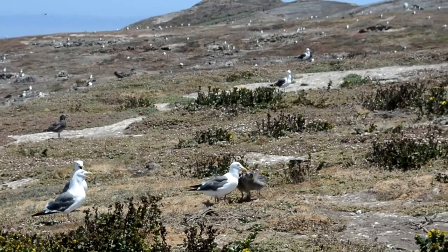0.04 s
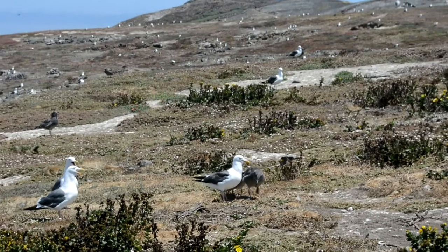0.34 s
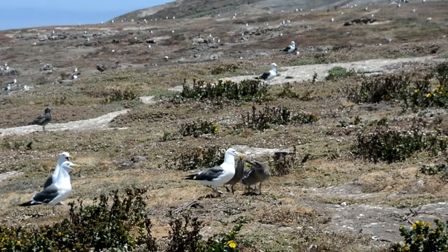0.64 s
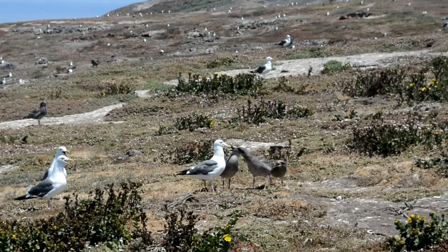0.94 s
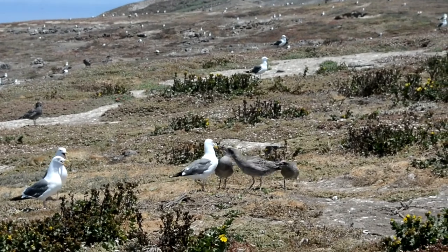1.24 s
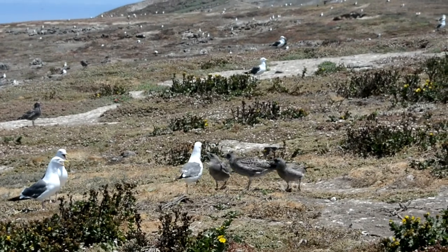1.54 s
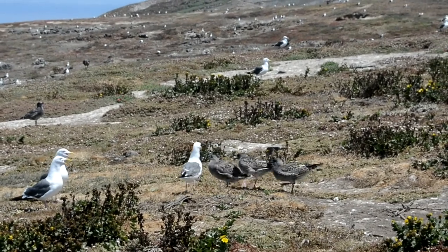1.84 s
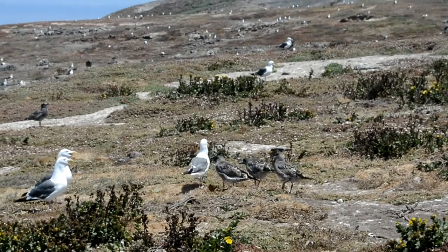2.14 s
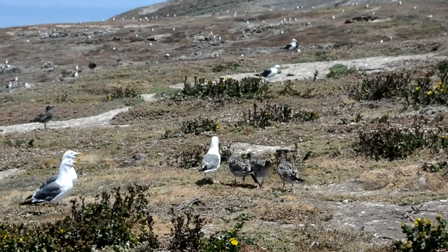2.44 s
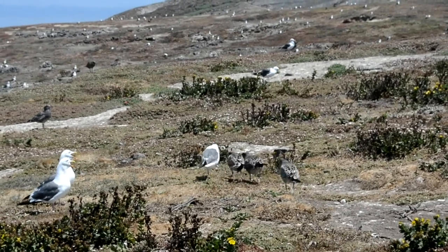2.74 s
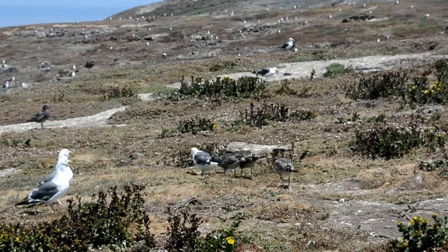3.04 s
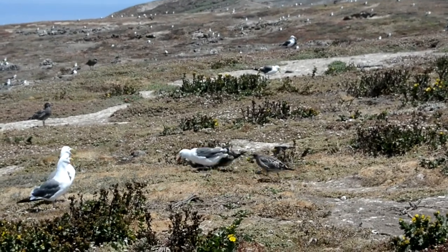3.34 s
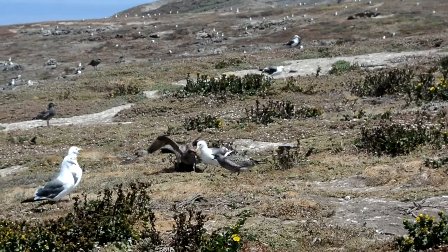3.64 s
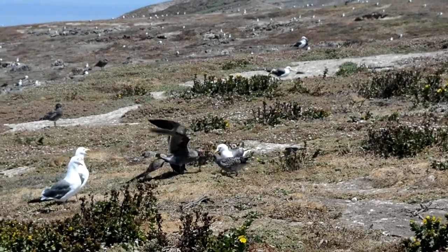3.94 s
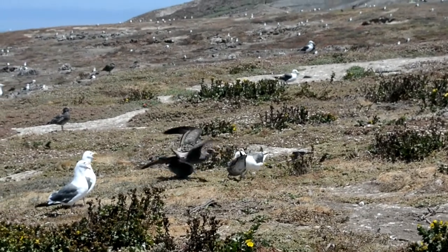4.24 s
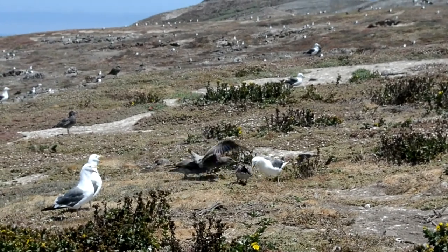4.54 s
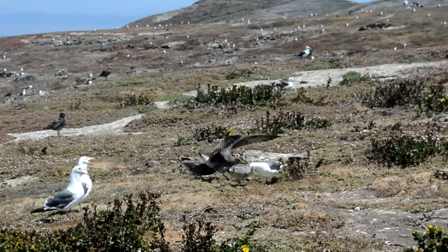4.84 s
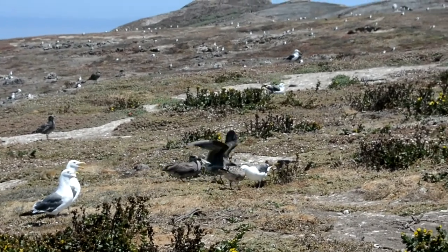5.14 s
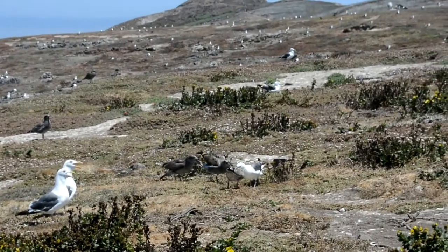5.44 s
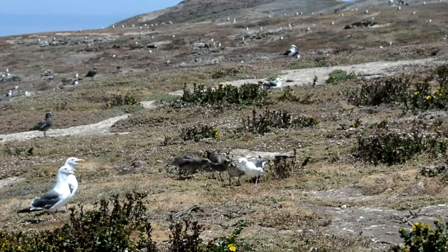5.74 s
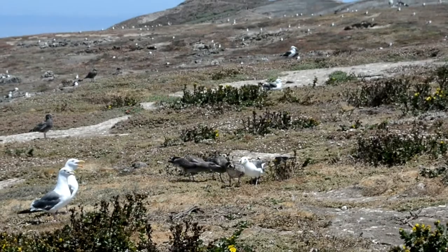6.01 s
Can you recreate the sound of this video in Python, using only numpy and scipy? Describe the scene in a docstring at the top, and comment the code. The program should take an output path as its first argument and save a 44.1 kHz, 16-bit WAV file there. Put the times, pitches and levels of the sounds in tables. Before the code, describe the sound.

A dense gull colony calls without a break for about six seconds on an open hillside. Several adults close ahead of the microphone overlap chains of short, arched cries, each at its own pitch, three or four notes a second. They are loudest in the first 1.3 seconds, and one sharp cry stands out at 2.5 seconds. Hoarse, throaty squawks pulse underneath, turning harsher from about 1.5 seconds and continuing to the end. Another clear chain of cries joins at around 4.2 seconds. Begging chicks give thin peeps and upward-breaking whistles, strongest between 0.6 and 1.2 seconds, then again near 2.1, 3.2 and 5.5 seconds. Two faint dry ticks come at about 4.4 seconds. Farther up the slope, hundreds of gulls merge into a restless din. There is hardly any echo, and light wind puffs on the microphone, mainly at the very start.

```python
"""Gulls giving long calls close ahead of the microphone, in a colony on an open hillside.
Each call is a steady chain of short arched cries, a tone from the syrinx with overtones shaped by the bill.
Under them, hoarse squawks pulse through throat and beak, and begging chicks whistle.
Farther up the slope, hundreds of birds merge into a din. Scrub and rock return a faint tail,
two dry ticks sound nearby, and a little wind touches the microphone."""
import sys
import numpy as np
from scipy import signal
from scipy.fft import rfft, irfft, next_fast_len
from scipy.io import wavfile
from scipy.ndimage import uniform_filter1d, map_coordinates

SR = 44100
rng = np.random.default_rng(int(sys.argv[2]) if len(sys.argv) > 2 else 0)


def pcm_store(signal):
    """Save signal as 16-bit PCM."""
    levels = np.round(np.clip(np.atleast_2d(signal), -1, 1) * 32767)
    wavfile.write(sys.argv[1], SR, levels.astype(np.int16).T)


N = 267995

# The near adults' long calls. Each bird: period, lead to the crest and trail after it in seconds,
# roughness 0-1, upper overtones in dB against the octave, course. Each row of a course marks a note:
# crest in seconds, crest pitch in Hz, fundamental in dB, octave in dB before the bill shapes it.
LONG_CALLS = { "leader": (.273, .034, 0.0472, 0.14, 0.21, [(-.024, 1727, -33, -31.5),
              (.517, 1728, -35, -31), (1.339, 1750, -35.5, -32.5), (1.888, 1726, -37, -30),
              (2.429, 1730, -36, -28.5), (3.249, 1734, -35, -27), (4.06, 1720, -35.5, -31),
              (4.605, 1722, -39, -30), (4.88, 1750, -37, -28.5), (5.156, 1748, -41, -31.5),
              (5.428, 1717, -38, -33.5), (5.975, 1664, -34.5, -32)]),
              "high rival": (.255, .029, 0.0366, .2, 0, [(3.603, 1670, -41.5, -33), (4.368, 1768, -38, -31),
              (4.884, 1780, -34, -36.5), (5.135, 1766, -35.5, -34.5), (5.902, 1782, -37.5, -34)]),
              "middle voice": (.248, .018, 0.0322, 0.3, 0, [(.208, 1547, -41, -29), (.7, 1548, -37, -31),
              (.942, 1567, -51.5, -31.5), (1.195, 1554, -45, -31), (1.445, 1560, -39.5, -31.5),
              (1.945, 1545, -38, -32.5)]), "thin voice": (.3, .014, .03, .5, -8, [(.483, 1452, -46, -30),
              (1.669, 1405, -55, -30), (2.014, 1410, -46, -29), (2.346, 1440, -49, -31),
              (2.947, 1440, -49, -31), (3.845, 1446, -46, -30.5)]),
              "loud voice": (.275, .017, .026, .1, -10, [(.097, 1486, -22.5, -25), (.367, 1441, -20, -25),
              (.639, 1426, -23, -27), (.938, 1425, -25, -32), (1.206, 1400, -29.5, -42)]),
              "low voice": (.3, .014, 0.0363, 0.15, -13.5, [(.426, 1307, -26, -26.5),
              (1.025, 1345, -30, -26.5), (1.313, 1333, -29, -26), (1.622, 1315, -27, -32),
              (1.933, 1314, -28, -34), (2.235, 1303, -32, -54), (2.825, 1300, -31.5, -51),
              (3.429, 1294, -28, -51), (3.735, 1320, -32.5, -48), (4.34, 1310, -30, -27),
              (4.64, 1262, -30.5, -30)]),
              "clear voice": (.305, .024, 0.0373, 0.3, -6, [(4.246, 1478, -30, -41.5),
              (4.507, 1490, -37, -62), (4.85, 1498, -45, -39), (5.15, 1490, -38, -38),
              (5.444, 1470, -30.5, -33), (5.768, 1495, -31.5, -34)]),
              "deep voice": (.268, .025, 0.023, .9, -30, [(.033, 1158, -23, -54), (.295, 1130, -24.5, -50),
              (.568, 1092, -26.5, -48)]), }
# Single cries from other gulls, several of them a little way up the slope. Each row: crest in seconds, crest
# pitch in Hz, lead and trail in seconds, # fundamental in dB, octave in dB before the bill shapes it.
LONE_CRIES = [(2.271, 1495, 0.037, 0.059, -41, -43), (2.501, 1453, 0.021, 0.018, -19, -64),
              (2.565, 1570, 0.028, 0.029, -40, -48), (3.346, 1600, 0.018, .03, -46, -42),
              (4.434, 1450, 0.016, 0.034, -48, -34.5), (4.779, 1487, 0.016, 0.034, -39, -39),
              (4.953, 1410, .013, 0.034, -34, -34), (5.05, 1330, .02, 0.037, -34, -53)]
# An adult's open bill shapes its overtones. Each row: frequency in Hz, gain in dB.
ADULT_BILL = [(2500, -12), (2800, 2.5), (3500, 4), (3900, -11.5), (4600, -12.5), (5200, -17.5),
              (5500, -25.5), (6100, -21.5), (7200, -29.5), (8400, -27.5), (9500, -37.5), (11000, -36.5),
              (13000, -62), (16000, -75)]
# Hoarse birds nearby. Each bird: period and squawk length in seconds, course.
# Each row of a course: middle in seconds, crest pitch in Hz, then throat, beak and hiss in dB.
SQUAWK_CHAINS = { "throaty": (.28, .1, [(.037, 330, -27.5, -47, -44.5), (.565, 295.6, -29, -57, -52),
                 (.88, 400, -30, -70, -61), (1.15, 400, -34.5, -62, -52), (1.43, 315, -31.5, -57, -43)]),
                 "scratchy": (.29, .16, [(.15, 369, -31.5, -37.5, -41.5), (.44, 381.4, -33, -41, -46.5),
                 (1.32, 402.2, -37.5, -39.5, -42.5)]),
                 "harsh": (.313, .145, [(1.525, 349, -44.5, -35, -47.5), (1.865, 398, -37.5, -32.5, -46),
                 (2.785, 421.2, -34, -33.5, -45), (3.72, 408, -34, -34.5, -43),
                 (4.03, 408, -32.5, -35, -46), (4.335, 393, -37, -33.5, -44), (4.61, 362, -29.5, -34, -44),
                 (4.95, 353, -31.5, -36.5, -52), (5.26, 308, -32.5, -35, -45),
                 (5.57, 290.6, -34.5, -36.5, -50), (5.91, 339, -33, -37, -47)]), }
# Spectra of a squawk's three parts. Each row: frequency in Hz, relative level in dB.
THROAT = [(120, -72), (220, -26), (310, -20), (470, -23.5), (650, -5.5), (800, -9.5), (1020, 4.5),
          (1250, -3), (1600, -23), (2200, -11.5), (4000, -94)]
BEAK = [(300, -70), (900, -44), (1450, 7.5), (1800, -3.5), (2050, 3), (2450, 13), (2900, 0), (3400, -3.5),
        (4200, -7), (6000, -73)]
HISS = [(500, -70), (1800, -46), (3000, 14), (4900, 12), (5500, 6.5), (6300, 3), (8300, 1), (10500, -10),
        (12500, -22), (15500, -50)]
# Chick whistles that break upward. Each row: time of the break, lead and trail in seconds, pitch in Hz
# at the start, just before the break and at the end, peak level in dB, overtone boost in dB.
BREAKING_WHISTLES = [(.629, .056, 0.029, 3200, 3305, 4270, -25.5, 0.5),
                     (.838, .045, 0.058, 3620, 3660, 4330, -31, 2),
                     (1.165, .048, .03, 3340, 3570, 4540, -23.5, -9.5),
                     (2.099, .059, 0.1, 3620, 3420, 3920, -33.5, 6.5),
                     (3.154, .063, 0.095, 3470, 3515, 4070, -34, 4.5),
                     (5.449, .056, 0.023, 3490, 3740, 4340, -33, -14),
                     (5.697, .03, 0.17, 4160, 4090, 4370, -37, -4)]
# Thin arched peeps at the top of a chick's range. Each row: crest, lead and trail in seconds,
# crest pitch, rise and fall in Hz, crest level in dB.
PEEPS = [(.06, .053, 0.059, 4870, 30, 30, -41), (.55, .04, .09, 5070, 150, 220, -48),
         (.705, 0.049, .04, 5140, 350, 120, -41.5), (1.222, 0.034, .075, 5290, 446, 380, -40.5),
         (1.239, 0.046, .09, 4790, 196, 249, -45), (1.761, 0.07, 0.06, 5320, 457, 332, -45.5),
         (2.489, 0.022, 0.11, 4760, 30, 450, -51), (3.305, 0.021, .075, 5330, 60, 880, -42.5),
         (5.488, .025, .046, 4800, 251, 350, -41.5)]
# A chick's bill shapes the overtones of its whistle. Each row: frequency in Hz, gain in dB.
CHICK_BILL = [(6400, -26), (7200, -16.5), (8200, -23), (8700, -8), (9300, -22), (10500, -31), (12500, -36),
              (14300, -36), (15500, -41)]
# Dry ticks nearby. Each row: start in seconds, level in dB before the treble is lifted.
TICKS = [(4.4, -31), (4.46, -37)]
# Spectra of the far colony and of wind on the microphone. Each row: frequency in Hz, relative dB.
DIN_SPECTRUM = [(20, -64), (60, -24.5), (200, -25), (310, -26.5), (450, -28), (650, -18), (1000, -8),
                (1350, -22), (1800, -20.5), (2700, -19), (5000, -32), (5700, -39), (9500, -45),
                (15000, -68)]
WIND_SPECTRUM = [(20, -66), (70, -1.5), (140, -0.5), (250, -3), (500, -7), (1500, -48)]
# Lulls in the far chorus. Each row: middle and length in seconds, gain in dB.
LULLS = [(0.375, 0.026, -12), (1.75, .08, 0), (2.022, 0.028, -8.5), (2.31, 0.13, -4.5), (3.92, 0.051, -0.5),
         (4.19, 0.024, 0), (4.5, 0.042, -4.5), (4.72, .06, -1), (5.024, 0.077, -5)]
# Puffs of wind on the microphone. Each row: middle and length in seconds, peak level in dB.
WIND_PUFFS = [(0.043, 0.15, -34), (0.223, .08, -51), (0.66, 0.044, -41.5), (2.18, 0.026, -59),
              (1.307, 0.075, -51), (5.467, 0.14, -55)]

SQUAWK_CREST = .25  # pitch and gape peak this many half lengths after a squawk's middle


def gull_cry(hz, lead, trail, low_db, octave_db, rough=.13, top_db=-5, bend=.13, rasp_hz=320,
             attack_s=.012, cut_s=.008, linger_s=.008):
    """Pitch leaps to a crest and falls as the force grows. Returns start (s from the crest) and sound."""
    t = np.arange(-lead - attack_s, trail + linger_s + cut_s, 1 / SR)
    steepness = bend * np.where(t < 0, 1.35, 1) * (1 + .05 * rng.normal())
    arch = 1 - steepness * (np.hypot(1, t / .02) - 1)
    arch -= .018 * np.maximum((t - trail) / .012 + 1, 0) ** 1.5  # a last drop in pitch
    # High notes strain just before the crest: they waver, flutter and split off a tone below the octave.
    high = 1 / (1 + np.exp((1650 - hz) / 50))
    strain = high * np.exp(-((t + .007) / .022) ** 2)
    waver = .0015 + .008 * rough + .006 * strain
    phase = 2 * np.pi * np.cumsum(hz * arch * (1 + waver * wobble(506, len(t)))) / SR
    split_ratio = 2 - 450 / hz * rng.uniform(.99, 1)
    split_gain = strain * amp(octave_db - 4.5 + 2 * rng.normal())
    overtones = split_gain * np.sin(split_ratio * phase + .5 * wobble(320, len(t)))
    upper_db = top_db + 5 * np.exp(-((t / trail - .53) / .5) ** 2)  # overtones ring out in the fall
    for k in range(2, 10):
        flicker_db = 5 * rough * wobble(140, len(t))
        source_db = octave_db + flicker_db + (k > 2) * (upper_db + 2.5 * rng.normal())
        overtones += amp(source_db + along(ADULT_BILL, k * hz * arch)) * np.sin(k * phase)
    fundamental = amp(low_db) * np.sin(phase) * gate(t, -lead, trail + linger_s, attack_s, cut_s)
    voice = fundamental + overtones * gate(t, -lead, trail, attack_s, cut_s)
    force = amp(2.5 * (1 + high) * np.clip(t / trail, -1, .5))
    force *= 1 + .3 * rough * wobble(356, len(t))
    force *= 1 + .4 * strain * wobble(900, len(t))
    force *= 1 + .22 * np.sqrt(high) * np.clip(2 * t / trail, 0, 1) * wobble(420, len(t))  # rattling fall
    # The slow beat of the syrinx splits each partial into hoarse side tones.
    rasp_depth = .13 * (1 + strain) * rng.uniform(.1, 1.8)
    force *= 1 + rasp_depth * np.sin(phase * rasp_hz / hz + .5 * wobble(201, len(t)))
    return t[0], np.sqrt(2) * voice * unit(force)


def near_gulls():
    """Adults close to the microphone overlap their long calls, each at its own pace, among lone cries."""
    out = np.zeros(N)
    notes = [(crest, hz, lead, trail, low_db, octave_db, rough, top_db)
             for period, lead, trail, rough, top_db, course in LONG_CALLS.values()
             for crest, hz, low_db, octave_db in chain(period, course)]
    for crest, *note in notes + LONE_CRIES:
        offset, sound = gull_cry(*note)
        add(out, crest + offset, sound)
    return out


def chain(period, course):
    """One row a note: the pace stays even while pitch and force drift between the marked notes."""
    course = np.array(course)
    steps = np.maximum(np.round(np.diff(course[:, 0]) / period), 1)
    marked = np.append(0, np.cumsum(steps))
    return np.transpose([np.interp(np.arange(marked[-1] + 1), marked, column) for column in course.T])


def squawks(air_share=.26, low_tone_db=-32):
    """A slow, uneven beat of the syrinx chops the air stream and rings throat and beak."""
    out = np.zeros(N)
    for s, length, crest_hz, throat_db, beak_db, hiss_db in squawk_notes():
        u = np.linspace(-2, 2, int(2 * length * SR))  # time in half lengths
        hz = squawk_pitch(crest_hz, u, jitter=.028)
        cycles = np.cumsum(hz) / SR
        air = unit(rng.standard_normal(len(u)) * np.exp(-1.6 * (cycles % 1)))
        voice = np.sqrt(1 - air_share) * syrinx_pulses(hz, smear_s=.0018) + np.sqrt(air_share) * air
        low_tone = np.sqrt(2) * np.sin(2 * np.pi * cycles + wobble(101, len(u)))
        swell = np.exp(-.7 * np.maximum(-u, 0) ** 2.85 - (1.25 * np.maximum(u, 0)) ** 4 / 2)
        swell *= amp(2.7 * wobble(52.3, len(u)))
        add(out, s - length, amp((throat_db + beak_db) / 2 + low_tone_db) * swell * low_tone)
        opening = np.exp(-(u - SQUAWK_CREST) ** 2)
        parts = (voice, THROAT, throat_db + 1), (voice, BEAK, beak_db), (air, HISS, hiss_db + .3)
        for source, spectrum, db in parts:
            add(out, s - length, amp(db) * swell * gaping_bill(source, spectrum, opening))
    return out


def squawk_notes(rasp_delay_s=.003, rasp_length_s=.15, rasp_hz=388.2):
    """The hoarse birds' chains, then the rasp under each cry of the leading gull."""
    for period, length, course in SQUAWK_CHAINS.values():
        for s, *pitch_and_levels in chain(period, course):
            yield (s, length, *pitch_and_levels)
    period, *_, course = LONG_CALLS["leader"]
    for crest, _, _, db in chain(period, course):  # the rasp follows the level of the octave
        yield crest + rasp_delay_s, rasp_length_s, rasp_hz, db - 17, db - 11.5, db - 12


def squawk_pitch(crest_hz, u, jitter):
    """The syrinx's beat rate rises and falls in a wavering arch over u, time in half lengths."""
    return crest_hz * np.exp(-.23 * (u - SQUAWK_CREST) ** 2 + jitter * wobble(250, len(u)))


def syrinx_pulses(hz, smear_s):
    """Uneven pulses at pitch hz, smeared so that each gape rings in its own way."""
    pulses = np.diff(np.floor(np.cumsum(hz) / SR), prepend=0) - hz / SR
    pulses *= amp(3.17 * wobble(299.3, len(hz)))
    return unit(signal.fftconvolve(pulses, scatter(smear_s))[:len(hz)])


def gaping_bill(source, spectrum, opening):
    """Resonances shift up as the bill opens (0-1); no two squawks share quite the same ones."""
    stretch = 1 + .025 * rng.normal()
    shut, wide = (colour(source, [(hz * factor * stretch, db) for hz, db in spectrum])
                  for factor in (.93, 1.03))
    return unit((1 - opening) * shut + opening * wide)


def chicks(wheeze_depth=.25, wheeze_below_hz=4250):
    """Begging chicks nearby: thin, nearly pure whistles, wheezy in their lower registers."""
    out = np.zeros(N)
    for s, hz, db, shrill_db in whistle_paths():
        t = np.arange(s[0] - .01, s[-1] + .01, 1 / SR)
        pitch = uniform_filter1d(np.interp(t, s, hz), size=130)
        pitch *= 1 + .002 * wobble(370, len(t)) + .003 * wobble(55.2, len(t))
        phase = 2 * np.pi * np.cumsum(pitch) / SR
        tone = np.sin(phase)
        for k in (2, 3):
            tone += amp(shrill_db + along(CHICK_BILL, k * pitch)) * np.sin(k * phase)
        tone *= 1 + wheeze_depth * (pitch < wheeze_below_hz) * wobble(700, len(t))
        quaver_db = 1.7 * wobble(220, len(t))
        envelope = amp(np.interp(t, s, db) + quaver_db) * gate(t, s[0], s[-1], .016, .016)
        add(out, t[0], np.sqrt(2) * tone * envelope)
    return out


def whistle_paths(break_ratio=1.18, break_s=.002, bow_hz_per_s=1400):
    """Each chick note's path: a slide that swells and breaks up into a bowed glide, or one arched peep."""
    glide = np.linspace(0, 1, 11)
    for s, lead, trail, start_hz, break_hz, end_hz, db, shrill_db in BREAKING_WHISTLES:
        bow_hz = bow_hz_per_s * trail * np.sin(np.pi * glide)
        upper_hz = (1 - glide) * break_ratio * break_hz + glide * end_hz + bow_hz
        times = np.r_[s - lead, s - break_s / 2, s + break_s / 2 + trail * glide]
        levels_db = db + np.r_[-8, 0, -5.5 - 3 * glide]
        yield times, np.r_[start_hz, break_hz, upper_hz], levels_db, shrill_db
    u = np.linspace(-1, 1, 21)
    for s, lead, trail, hz, rise_hz, fall_hz, db in PEEPS:
        times = s + u * np.where(u < 0, lead, trail)
        yield times, hz - np.where(u < 0, rise_hz, fall_hz) * u ** 2, db - 3 * u ** 2, 0


def ticks(t60=.014):
    """Two short, bright snaps near the microphone."""
    out, t = np.zeros(N), np.arange(SR // 20) / SR
    for s, db in TICKS:
        add(out, s, amp(db - 60 * t / t60) * rng.standard_normal(len(t)))
    return colour(out, [(1000, -7), (5000, 10), (10000, 7), (15000, -19)])


def far_cries(count=190, low_hz=1000, high_hz=1560, level_db=-39.5):
    """Gulls farther up the slope call at random, weaker and duller with distance."""
    out = np.zeros(N)
    for s, (pitch, size, length) in random_calls(count):
        hz = low_hz + (high_hz - low_hz) * (pitch + 1) / 2
        stretch = np.exp(.253 * length)
        db = level_db + 3 * size - 2 * pitch
        _, sound = gull_cry(hz, .02 * stretch, .0288 * stretch, db, db - 3,
                            rough=.3, top_db=-10, bend=.1305 / stretch)
        add(out, s, sound)
    return out


def far_yelps(count=170, low_hz=280, high_hz=430, length_s=.085):
    """Hoarse yelps from all over the slope, each a quick arch of low syrinx pulses."""
    out = np.zeros(N)
    for s, (pitch, size, stretch) in random_calls(count):
        length = length_s * 2 ** (stretch / 2)
        u = np.linspace(-2, 2, int(2 * length * SR))
        hz = squawk_pitch(low_hz + (high_hz - low_hz) * (pitch + 1) / 2, u, jitter=.026)
        add(out, s - length, amp(3 * size) * np.exp(-u ** 4) * syrinx_pulses(hz, smear_s=.0012))
    return unit(out)


def random_calls(count):
    """Loosely spaced times in seconds, each with draws from -1 to 1 for pitch, level and length."""
    times = (np.arange(count) + rng.uniform(-1, 1, count)) * N / SR / count
    return zip(times, rng.uniform(-1, 1, (count, 3)))


def far_din(level_db=-33.5, blur_db=-8):
    """Far yelps, and behind them the farthest birds merged into one restless band of sound."""
    unrest_db = 1.8 * wobble(14, N) + 1.3 * wobble(60, N)
    chorus = far_yelps() + amp(blur_db + unrest_db) * rng.standard_normal(N)
    return amp(level_db) * unit(colour(chorus, DIN_SPECTRUM))


def lulls():
    """Gain of the far chorus, which thins out now and then."""
    return amp(sum(db * bump(s, length) for s, length, db in LULLS))


def hillside_echo(x, t60=.086):
    """Scrub and rock scatter a short tail, different on each side of the microphone."""
    t = np.arange(SR // 2) / SR
    spectrum = [(300, 23.5), (1200, -11), (3500, 7.5), (10000, -8)]
    mid, side = colour(rng.standard_normal((2, len(t))), spectrum) * amp(-60 * t / t60)
    tail = mid + .3 * np.array([side, -side])
    return signal.fftconvolve(x[None], tail / np.linalg.norm(tail[0]), axes=1)[:, :N]


def wind(calm_db=-67, left_db=-4):
    """Air on the microphone: a low rumble with brief puffs, unrelated on the two ports."""
    strength = amp(calm_db) + sum(amp(db) * bump(s, length) for s, length, db in WIND_PUFFS)
    turbulence = rng.standard_normal((2, N)) * amp([[left_db], [0]])
    return strength * unit(colour(turbulence, WIND_SPECTRUM))


def amp(db):
    """Decibels to gain."""
    return 10 ** (np.asarray(db) / 20)


def unit(x):
    """x at rms 1."""
    return x / np.sqrt(np.mean(x ** 2) + 1e-20)


def along(points, hz):
    """(Hz, value) points read on a log axis."""
    freqs, values = np.transpose(points)
    return np.interp(np.log(hz + 1), np.log(freqs + 1), values)


def wobble(rate, size):
    """A smooth random curve, rate knots a second."""
    knots = rng.standard_normal(int(size * rate / SR) + 4)
    return map_coordinates(knots, [np.arange(size) * rate / SR])


def colour(x, points):
    """x through a (Hz, dB) spectrum that keeps the power of white noise."""
    size = x.shape[-1]
    padded = next_fast_len(size + 2048)
    gain = unit(amp(along(points, np.fft.rfftfreq(padded, 1 / SR))))
    return irfft(rfft(x, padded) * gain, padded)[..., :size]


def scatter(decay_s):
    """A short random response of unit energy that smears a sound."""
    t = np.arange(int(3 * decay_s * SR) + 2) / SR
    response = rng.standard_normal(len(t)) * np.exp(-t / decay_s)
    return response / np.linalg.norm(response)


def gate(t, start, end, attack, release):
    """1 between start and end, with soft edges."""
    ramp = np.minimum((t - start) / attack, (end - t) / release) + .5
    return np.sin(np.pi / 2 * np.clip(ramp, 0, 1)) ** 2


def bump(s, length):
    """A bell curve of height 1 around time s."""
    return np.exp(-(2 * (np.arange(N) / SR - s) / length) ** 2)


def add(track, s, sound):
    """Mix a sound into a track from time s on."""
    start = round(s * SR)
    a, b = max(start, 0), min(start + len(sound), N)
    if b > a:
        track[a:b] += sound[a - start:b - start]


def scene(side_db=-5, near_echo_db=-24, far_echo_db=-10):
    """The birds sit in the centre; a smeared copy, mostly treble, widens the stereo image."""
    near = near_gulls() + squawks() + chicks() + ticks()
    far = lulls() * far_cries()
    birds = near + far + lulls() * far_din()
    smeared = signal.fftconvolve(birds, scatter(.015))[:N]
    side_spectrum = [(1200, -28.5), (2800, -13.5), (5000, -25), (8000, -6), (16000, 5.5)]
    side = amp(side_db) * colour(smeared, side_spectrum)
    echo = hillside_echo(amp(near_echo_db) * near + amp(far_echo_db) * far)
    return np.array([birds + side, birds - side]) * amp([[-.2], [.2]]) + echo + wind()


def record(dry, top_hz=15650):
    """The camera keeps nothing above its band limit."""
    padded = next_fast_len(N + 8192)
    passband = np.fft.rfftfreq(padded, 1 / SR) < top_hz
    return irfft(rfft(dry, padded) * passband, padded)[..., :N]


dry = scene()
out = record(dry)
pcm_store(out)
```